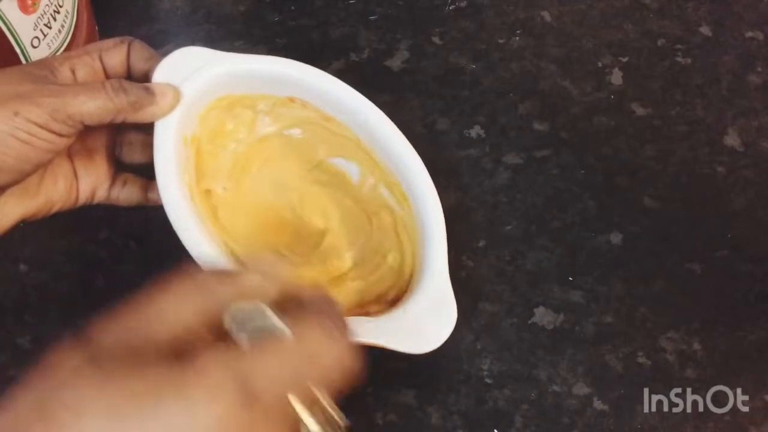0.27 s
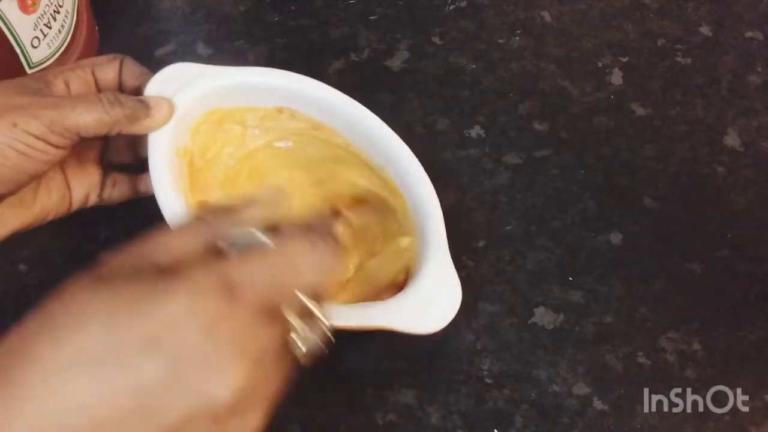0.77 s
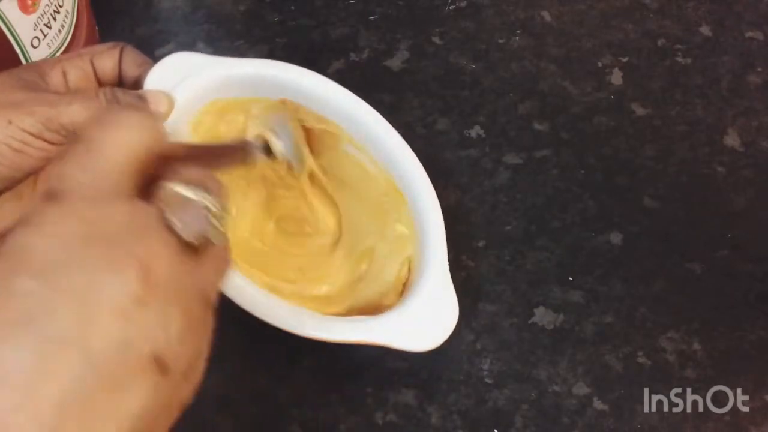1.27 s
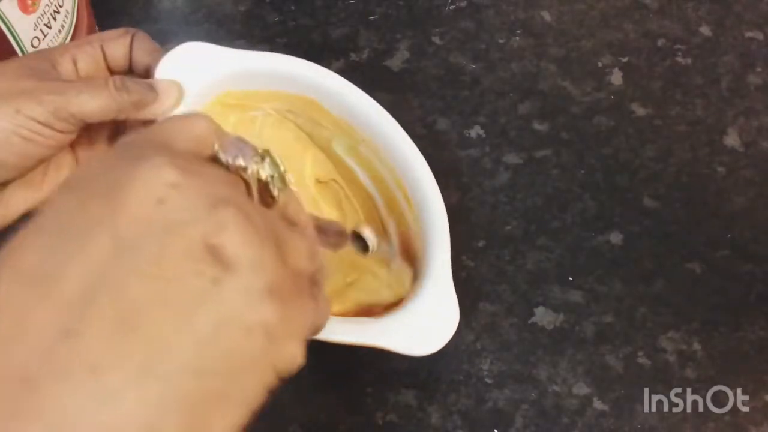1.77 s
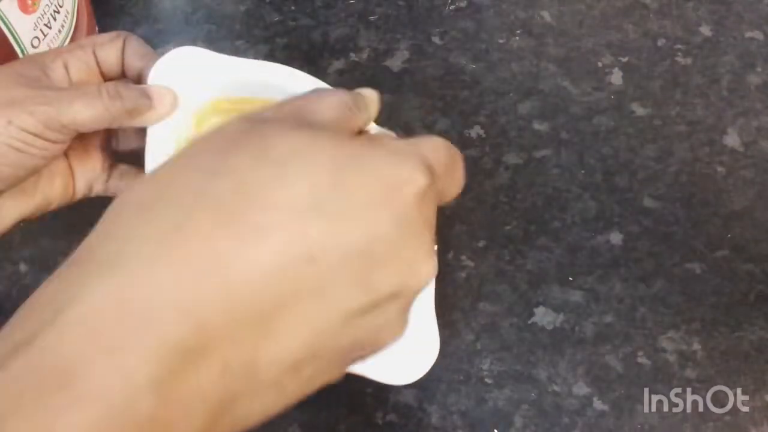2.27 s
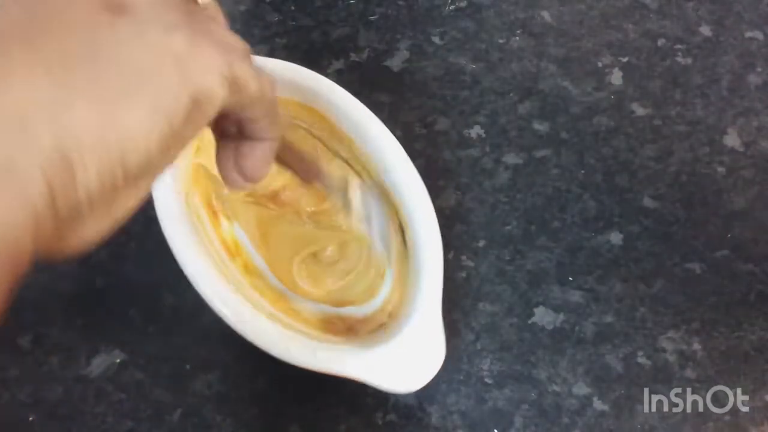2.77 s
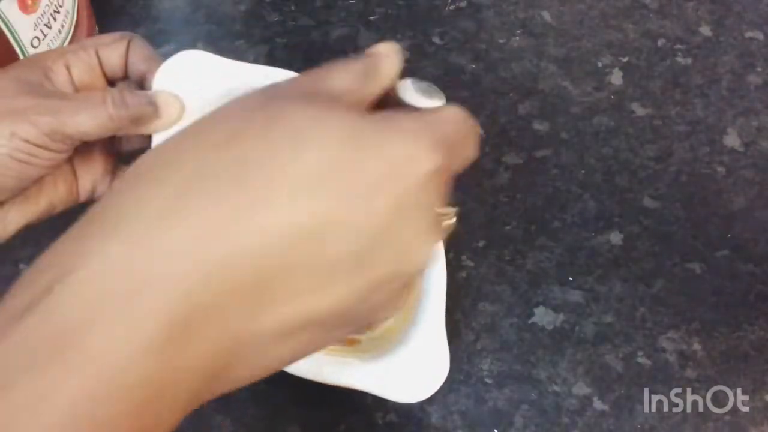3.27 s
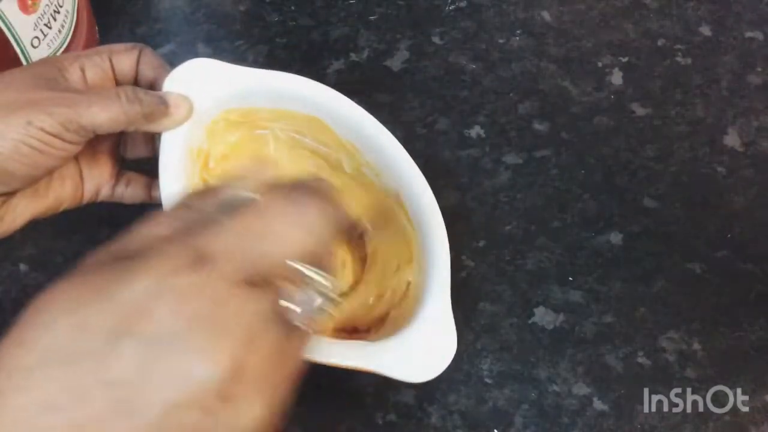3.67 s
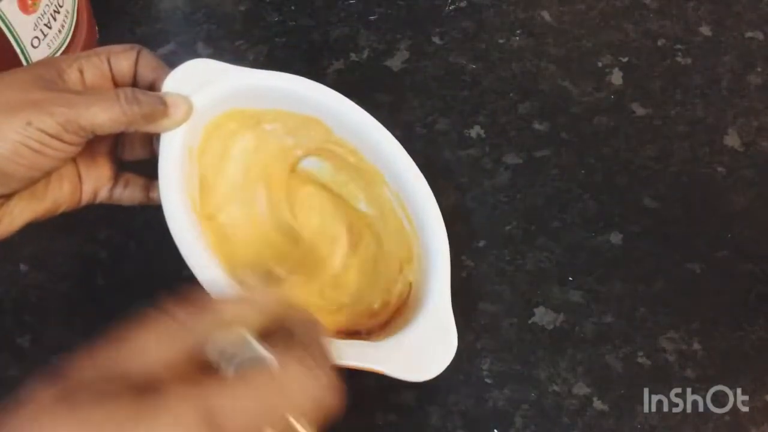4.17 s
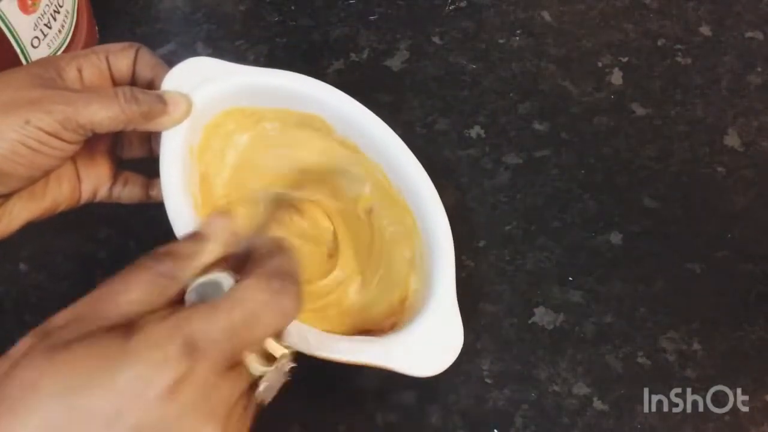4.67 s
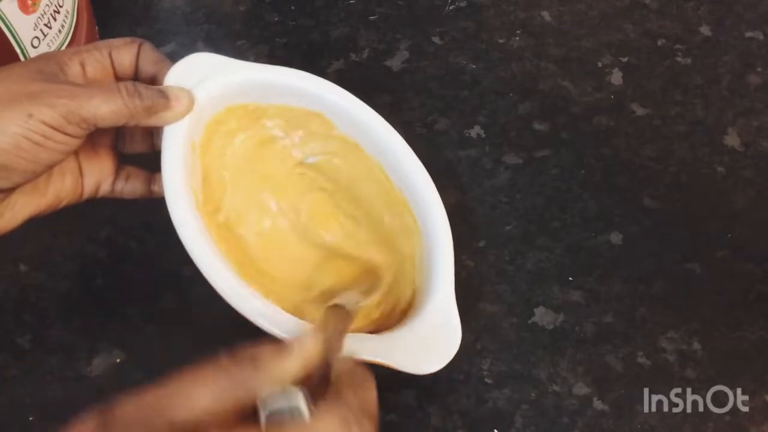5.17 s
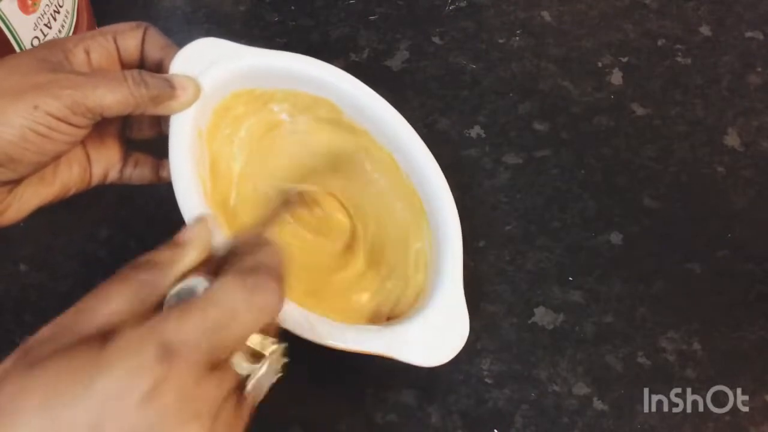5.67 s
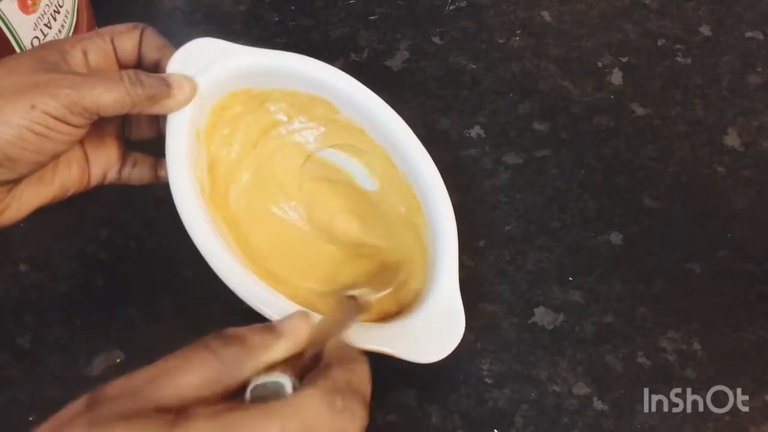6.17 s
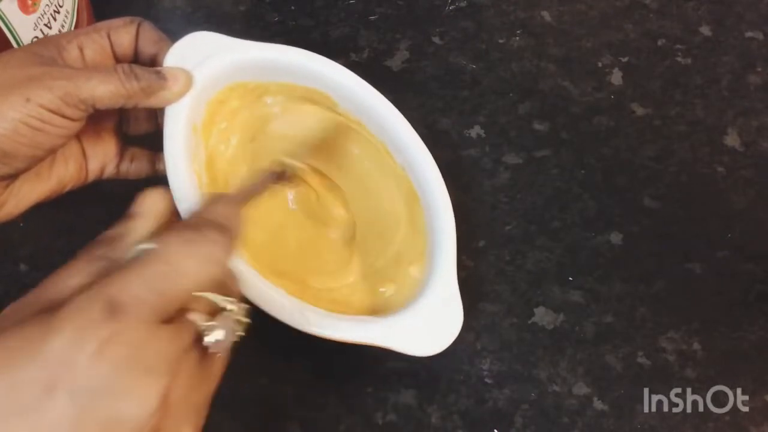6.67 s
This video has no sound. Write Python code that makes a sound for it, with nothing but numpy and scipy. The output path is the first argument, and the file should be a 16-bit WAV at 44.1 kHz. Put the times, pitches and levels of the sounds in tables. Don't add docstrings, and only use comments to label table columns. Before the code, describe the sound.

Close, lively spoon taps ring briefly on a small ceramic dish as thick sauce is stirred, the edge scraping between quick clinking runs.

```python
import sys
import numpy as np
from scipy import signal
from scipy.fft import rfft, irfft
from scipy.io import wavfile
from scipy.ndimage import uniform_filter1d

SR = 44100
rng = np.random.default_rng(int(sys.argv[2]) if len(sys.argv) > 2 else 0)


def rack_gain(trim_db):
    fader = np.asarray(trim_db, float)
    return 10 ** (fader / 20)


def log_audio(samples):
    frames = np.atleast_2d(samples).T
    limited = np.clip(frames, -1, 1)
    pcm = np.round(limited * 32767).astype(np.int16)
    wavfile.write(sys.argv[1], SR, pcm)


N = 304290

# [t/s, crack level/dB, ring level/dB of the 2 kHz, 4.6 kHz and 4.9 kHz families]
TAPS = [(0.161, -21, -36, -21, -50), (0.3976, -20, -32.5, -52, -57), (0.7812, -18.5, -34, -37, -21.5),
        (1.1143, -15, -37, -18.5, -20), (2.7106, -31.5, -38, -33, -29), (2.8342, -13, -40, -19, -31.5),
        (2.8531, -27, -24, -41, -34), (3.6295, -10.5, -14.5, -17.5, -22),
        (3.8388, -14.5, -17.5, -11.5, -10.5), (4.1515, -7, -18, -2.5, -10), (4.3143, -8, -23, -11, -15),
        (4.4534, -16, -20.5, -40, -27.5), (4.6078, -9.5, -25, -39, -12.5),
        (4.9489, -17, -30.5, -3.5, -13.5), (5.082, -11.5, -17.5, -43, -8),
        (5.276, -12.5, -31.5, -12.5, -11), (5.4163, -7, -12.5, -25, -8), (5.6095, -20.5, -29, -50, -15),
        (5.763, -12.5, -21, -3.5, -12), (5.9749, -26.5, -29.5, -20, -18.5), (6.1158, -22, -29, -19.5, -24),
        (6.2935, -20.5, -37, -40, -32.5), (6.6036, -21.5, -36.5, -47, -18.5)]
# [lowest mode f/Hz, twin level/dB, 8 kHz family level/dB, share of ring time]
TAP_SPOTS = [(2000, -2, 4, 0.98), (1965, 9, -9, 0.63), (2125, 5, -3, 0.9), (2073, 6.5, 1.5, 1),
             (1990, -2, 4, 0.78), (2010, -2, -4, 1), (2050, 2, 3, 1), (2052, -3.5, -4, 1),
             (2080, -2, -0.5, 1), (2070, -6, -3, 0.97), (2010, -8, -3.5, 1), (2050, -3, 6, 0.81),
             (1955, 6, 0, 0.7), (1930, -7, 3, .5), (2055, -12, 3.5, 0.75), (1955, 7.5, -6, 0.66),
             (2062, 3, -0.5, 0.76), (1960, -4, 2, 0.61), (1999, 3, 2.5, 0.84), (2030, -5, 2.5, 0.84),
             (1960, -2, -2, 0.7), (2000, -3, -1, 0.94), (1990, 12, 0.5, 0.99)]
# [4.6, 4.9 and 8 kHz mode f/Hz, share of ring time, side of the twin's node (+1 or -1)]
SAUCE_LOADS = [(4680, 4860, 8030, 0.79, 1), (4640, 4853, 8400, .9, 1), (4580, 4850, 8061, .9, 1),
               (4650, 4853, 8045, 0.96, 1), (4640, 4860, 8030, 0.71, 1), (4680, 4400, 9000, 0.88, 1),
               (4700, 4870, 9100, 0.92, -1), (4640, 4400, 8018, 1.1, -1), (4660, 4866, 8287, 0.98, 1),
               (4660, 4882, 8074, 0.99, 1), (4685, 4866, 8053, 0.89, 1), (4618, 4900, 8072, 0.74, 1),
               (4670, 4866, 8109, 0.66, 1), (4650, 4844, 8026, 1, 1), (4635, 4858, 8021, 0.87, 1),
               (4640, 4863, 7200, 0.83, 1), (4624, 4882, 8007, 1.15, 1), (4635, 4855, 8004, 0.75, 1),
               (4720, 4826, 8013, 0.87, 1), (4662, 4870, 8040, 0.7, 1), (4650, 4839, 8037, 0.71, 1),
               (4640, 4860, 8030, .9, 1), (4700, 4815, 8126, 0.64, 1)]
# [low modes after t/s, upper modes after t/s, ring time gained as factor]
CHOKES = [(.02, .02, 1.1), (.02, .02, 1.05), (.010, .018, 1.1), (.014, 0.027, 1.2), (.02, .02, 1.04),
          (.02, 0.024, 1), (0.011, .02, 1.2), (0.012, 0.033, 3.2), (0.025, 0.034, 1.53), (.022, .024, 1.3),
          (0.011, .03, 1.4), (.017, 0.015, 1.14), (0.0062, 0.014, 1.5), (0.0079, .022, 1.1),
          (0.017, 0.014, 1.4), (0.0093, .02, 1.1), (0.021, .021, 1.2), (0.0055, .018, 1.25),
          (0.025, 0.013, 2), (0.014, .014, 1.6), (.010, 0.0097, 1.3), (.02, .02, 1), (.03, .03, 1.27)]
# [t/s, level/dB]
TICKS = [(0.072, -36), (0.6749, -36), (1.024, -28.5), (2.871, -35), (3.5149, -32), (3.943, -26.5),
         (4.1378, -30), (4.556, -30), (5.0104, -34), (5.5104, -45), (6.1649, -35), (6.211, -33),
         (6.553, -22.5), (6.737, -34), (6.0767, -36), (1.5265, -44)]
BOWL_HZ = [
    [2051, 1986, 2148],
    [4643, 4500],
    [4862, 4925],
    [8030, 8150, 8330, 9280, 12120],
]
# [level/dB, t60/s]
BOWL_DECAY = [
    [(4, 0.062), (2, 0.023), (-25, 0.027)],
    [(-3, 0.045), (-30, 0.017)],
    [(-0.5, 0.055), (-36, 0.037)],
    [(4.5, 0.055), (2.5, 0.04), (-0.5, 0.04), (-5, 0.038), (-10, 0.025)],
]
# [f/Hz, level/dB per Hz]
CRACK_SPECTRUM = [(410, -85), (700, -43), (1790, -14), (3040, -9), (4890, -3.5), (6450, -9), (8290, -7),
                  (10400, -16.5), (15200, -22), (16500, -74)]
# [t/s, level/dB, f/Hz]
KNOCKS = [(0.073, -27, 1450), (0.165, -31.5, 1350), (0.398, -18.5, 1570), (0.6766, -29, 1570),
          (0.7798, -31, 1240), (1.0248, -21, 1570), (1.1912, -36.5, 1060), (1.4312, -34, 1630),
          (2.834, -41, 1170), (2.866, -37, 1200), (2.7092, -31, 1340), (2.854, -27, 1430),
          (3.5167, -32, 1320), (3.8427, -23, 1750), (3.9444, -19.5, 1420), (4.153, -22, 1520),
          (4.2597, -27, 1460), (4.396, -32, 1680), (4.4524, -15, 1657), (4.557, -23.5, 1420),
          (4.838, -39, 1430), (4.949, -31, 1610), (5.0126, -35.5, 1280), (5.0826, -8.5, 1703),
          (5.2742, -24.5, 1610), (5.4182, -14, 1570), (5.5112, -28.5, 1570), (5.866, -34.5, 1530),
          (6.1186, -24, 1800), (6.166, -30, 1330), (6.2121, -27.5, 1570), (6.5548, -15.5, 1430)]
# [t/s, level/dB, f/Hz]
TOUCHES = [
    (1.527, -43, 1200),
    (1.59, -39.5, 1680),
    (3.393, -42, 1600),
    (4.091, -42, 1280),
    (6.392, -45.5, 1170),
]
# [t/s, level/dB, trapped hollow f/Hz]
SLAPS = [(0.0726, -44, 3750), (0.164, -32, 3900), (0.7808, -11.5, 3920), (1.0248, -44, 3750),
         (1.192, -41, 3400), (2.7096, -32, 3750), (3.517, -42, 3750), (3.6295, -11, 3500),
         (3.84, -19.5, 3750), (4.152, -12, 3570), (4.4525, -23, 3750), (4.608, -20, 2700),
         (4.949, -11, 3900), (5.0832, -12, 7700), (5.276, -17.5, 4060), (5.417, -12, 3230),
         (5.61, -20, 2700), (5.762, -19.5, 3210), (5.9735, -18, 3970), (5.9734, -23.5, 3250),
         (5.974, -21.5, 2400), (6.1167, -17, 2240), (6.557, -41, 3750), (6.6034, -26, 2510)]
# [t/s, level/dB, f/Hz]
CHATTER_STROKES = [(1.6523, -40, 1830), (1.7032, -42, 2010), (1.7122, -40, 2090), (1.7336, -34, 2000),
                   (1.9142, -45, 2090), (1.9446, -33, 2260), (1.9516, -30, 2150), (1.9776, -35, 2080),
                   (2.0509, -41, 1940), (2.0509, -38, 2000), (2.0709, -35, 1980), (2.0983, -38, 1910),
                   (2.1297, -33, 1950), (2.1392, -39, 1960), (2.1656, -46, 1940), (2.2095, -40, 2000),
                   (3.0954, -34, 2020), (3.1014, -31, 2050), (3.1068, -28, 2010), (3.1184, -31, 1990),
                (3.1264, -30, 1960), (3.1418, -28, 1990), (3.1524, -31, 2000), (3.1732, -39, 2010),
                (3.2181, -42, 1930), (3.2312, -35, 1820), (3.2794, -42, 2010)]
# [t/s, level/dB, f/Hz]
CHATTER_FINE = [(1.4315, -38, 2030), (1.526, -41, 4640), (1.706, -38, 4860), (1.944, -35, 4640),
                (1.956, -34, 4640), (2.166, -40, 4650), (2.235, -41, 4850), (3.624, -33, 4750),
                (3.692, -30, 2050), (5.322, -31, 2000), (5.998, -29, 1980), (6.015, -33, 1900),
                (6.036, -28, 2050), (6.0767, -32, 1990), (6.0767, -39, 4800), (6.655, -32, 2000)]
# [t/s, glaze pressure level/dB, pushed sauce level/dB]
STIR = [(0.0, -50.5, -41.5), (0.48, -45, -44.5), (0.69, -50, -41), (0.94, -50.5, -66), (1.44, -49.5, -48),
        (1.67, -48.5, -41), (2.11, -39.5, -53), (2.3, -45, -39), (2.56, -77, -43.5), (2.9, -70, -63),
        (3.23, -43, -46), (3.36, -51.5, -50), (3.8, -45.5, -35.5), (4.26, -55, -64), (4.77, -42, -47),
        (5.5, -44.5, -44), (6.23, -47.5, -41.5), (6.9, -50, -47)]
# [start t/s, end t/s, ring level/dB, hollow level/dB, smear level/dB]
STROKES = [(1.294, 1.337, -68, -53.5, -79), (1.362, 1.426, -56, -51.5, -62), (1.598, 1.734, -53, -55, -64),
           (1.66, 1.836, -53, -53.5, -69), (1.912, 2.004, -51, -51, -55), (2.035, 2.167, -54, -54, -57),
           (2.094, 2.27, -51.5, -58, -51), (2.99, 3.06, -54, -61, -66), (3.054, 3.198, -45, -52, -50.5),
           (3.162, 3.318, -57, -53.5, -64), (3.392, 3.52, -48, -60, -46), (4.008, 4.153, -49, -61, -48.5)]
# [f/Hz, width f/Hz, level/dB]
HOLLOW = [(1200, 260, 0), (1570, 150, 5.5), (2400, 2080, -3.5)]
# [f/Hz, width f/Hz, level/dB]
SMEAR = [(3300, 610, -2), (3900, 730, -1), (5140, 1450, -4), (9200, 2900, -7.5)]
# [start t/s, end t/s, level/dB, first f/Hz, last f/Hz]
SUCKS = [(.165, 0.184, -41.5, 1954, 1495), (0.348, 0.397, -52.5, 1780, 1780),
         (1.378, 1.404, -52, 1700, 1780), (1.735, 1.805, -49, 2300, 2400), (1.927, 1.99, -44, 2300, 2177),
         (2.117, 2.232, -46, 1610, 1570), (3.16, 3.272, -48, 1058, 1373), (3.208, 3.263, -51, 1666, 1770),
         (3.75, 3.816, -46.5, 1950, 1800), (4.765, 4.805, -50, 1350, 1550), (3.075, 3.15, -52, 1400, 1250),
         (1.6, 1.64, -52.5, 2400, 2600), (5.385, 5.413, -49, 1030, 1280), (5.987, 6.045, -46, 2030, 1565)]
# [start t/s, end t/s, level/dB, first f/Hz, last f/Hz]
SMACKS = [(0.162, 0.267, -47.5, 4260, 3890), (.45, 0.578, -50, 3640, 4030), (0.784, 0.928, -55, 3900, 4020),
          (1.13, 1.2, -49.5, 2900, 3300), (1.64, 1.7, -50, 3200, 3140), (1.702, 1.73, -49, 4970, 5000),
          (3.094, 3.156, -48.5, 3300, 3190), (3.43, 3.483, -47, 4320, 5300), (3.64, 3.72, -43, 3000, 3300),
          (3.72, 3.83, -48, 3500, 3200), (4.045, 4.11, -43, 3950, 3850), (4.647, 4.704, -44.5, 3800, 4070),
          (4.76, 4.79, -47.5, 4230, 3820), (4.963, 5.046, -51, 3820, 4070),
          (5.645, 5.72, -47.5, 3130, 3800), (6.306, 6.37, -47.5, 3670, 3670),
          (6.63, 6.7, -44.5, 3300, 3900)]
# [start t/s, end t/s, level/dB, first f/Hz, last f/Hz]
WHISTLES = [
    (4.635, 4.7, -42.5, 2000, 1146),
    (5.318, 5.36, -45, 1930, 1127),
    (5.682, 5.728, -46, 1930, 1177),
]
# [t/s, level/dB, bass level/dB, low modes level/dB]
THUDS = [(0.073, -54, -62, -61), (0.162, -44.5, -64, -78), (0.397, -31, -64, -48), (0.674, -55, -70, -73),
         (0.781, -32.5, -48, -52), (1.025, -37, -64, -70), (1.114, -34, -65, -61),
         (2.707, -35.5, -52.5, -57), (2.834, -36, -53, -44.5), (2.853, -35.5, -52, -59),
         (2.873, -37, -67, -55), (3.127, -52, -56, -61), (3.513, -40.5, -63, -57), (3.629, -24.5, -61, -49),
         (3.703, -43, -78, -74), (3.84, -59, -82, -81), (3.942, -40, -64, -68), (4.313, -39.5, -58, -62),
         (4.556, -43, -61, -61), (4.607, -37, -57, -54), (4.946, -33, -72, -59), (5.274, -33.5, -64, -49.5),
         (5.609, -40, -69, -61.5), (5.762, -47, -77, -64), (6.115, -51.5, -63, -58),
         (6.289, -43.5, -73, -64), (6.555, -39.5, -49.5, -45), (6.603, -42, -76, -66)]
# [highest of the upper three counter modes over their lowest,
# level/dB]
THUD_TILT_DB = [-4, 4, 2.5, 3, 2, 8, 7, 3, -1, -1, 1, 1, -1, 1, 1, 3, 3, -0.5, -3, 1, -5, -2, -1, -1, 1, 2,
                -5, 5]
# [f/Hz, level/dB, t60/s]
COUNTER = [(262.5, -4, 0.18), (318.7, -1, 0.15), (373, 1.5, 0.09), (430, 2.5, 0.075), (505, -3.5, 0.12)]
# [t/s, level/dB]
PUSHES = [
    (0.398, -48),
    (0.782, -47),
    (2.708, -53),
    (2.835, -48),
    (2.8532, -30),
    (2.874, -41),
    (3.628, -44),
    (4.948, -57),
    (5.273, -48),
    (6.554, -44),
]
# [f/Hz, width f/Hz, level/dB]
PUSH_BODY = [(332, 320, 1), (109, 150, 4.5)]
# [start t/s, end t/s, level/dB]
SHOVE = (1.67, 2.41, -63)
# [f/Hz, level/dB per Hz]
HISS_SPECTRUM = [(21, -37), (35, -10), (275, -10), (338, -16), (448, -8), (537, -10), (1290, -11.5),
                 (2160, -8), (2450, -10), (3700, -7), (4790, -5.5), (5890, -3), (9360, -1.5),
                 (15300, -16.5), (16500, -15)]

BOWL = [[(hz, *decay) for hz, decay in zip(*family)] for family in zip(BOWL_HZ, BOWL_DECAY)]   # f/Hz, level/dB, t60/s


def rms_one(x):
    return x / np.sqrt(np.mean(x ** 2) + 1e-20)


def clicks(times, db):
    out = np.zeros(N) + 1e-18
    at = np.round(np.asarray(times) * SR).astype(int)
    np.add.at(out, np.clip(at, 0, N - 1), rack_gain(np.asarray(db)))
    return out


def ring(x, hz, t60):
    r, w = rack_gain(-60 / (t60 * SR)), 2 * np.pi * hz / SR
    return signal.lfilter([0, np.sin(w)], [1, -2 * r * np.cos(w), r * r], x)


def modes(x, table):
    return sum((-1) ** k * rack_gain(db) * ring(x, hz, t60) for k, (hz, db, t60) in enumerate(table))


def resonate(x, table):
    return sum((-1) ** k * rack_gain(db) * signal.lfilter(*signal.iirpeak(hz, hz / width, fs=SR), x)
               for k, (hz, width, db) in enumerate(table))


def colour(x, spectrum):
    hz, db = np.transpose(spectrum)
    grid = np.fft.rfftfreq(8192, 1 / SR)
    cepstrum = irfft(np.log(rack_gain(np.interp(np.log(grid + 1), np.log(hz), db))))
    cepstrum[1:4096] *= 2
    cepstrum[4097:] = 0
    return signal.fftconvolve(x, irfft(np.exp(rfft(cepstrum))))[:N]


def drift(rate):
    r = np.exp(-2 * np.pi * rate / SR)
    return rms_one(signal.lfilter([1], [1, -2 * r, r * r], rng.standard_normal(N + SR))[SR:])


def grains(per_s, spread_db):
    born = rng.random(N) < per_s / SR
    size = rack_gain(spread_db * np.minimum(rng.exponential(1, N), 4))
    return rms_one(born * size * rng.choice([-1, 1], N))


def burst(times, db, t60, rise_s=0.001):
    swell = np.exp(-1 / (rise_s * SR))
    dying = signal.lfilter([1], [1, -rack_gain(-60 / (t60 * SR))], clicks(times, db))
    return signal.lfilter([1 - swell], [1, -swell], dying) * rng.standard_normal(N)


def hump(start, end, edge):
    span = slice(int(start * SR), int(end * SR))
    return span, signal.windows.tukey(span.stop - span.start, np.clip(edge, 0, 1))


def taps():
    s, crack_db, *family_db = np.transpose(TAPS)
    low_hz, twin_db, top_db, low_lasting = np.transpose(TAP_SPOTS)
    *upper_hz, upper_lasting, side = np.transpose(SAUCE_LOADS)
    low_choke_s, upper_choke_s, gained = np.transpose(CHOKES)
    tick_s, tick_db = np.transpose(TICKS)
    top_follows = np.dot((0.66, 0.46, 0.0061, 0.086), [crack_db, *family_db])
    family_db.append(top_db - 7.5 + top_follows)

    crack = colour(burst(np.r_[s, tick_s], np.r_[crack_db + 8.5, tick_db + 12.0], t60=0.011), CRACK_SPECTRUM)
    rattle = colour(burst(s, crack_db - 6.5, t60=0.055), CRACK_SPECTRUM)

    size, detune, choke_t60_s = SR // 4, 0.004, 0.019
    since, one_tap = np.arange(size) / SR, np.arange(size) < 200
    loaded_hz = dict(zip((0, 3, 5, 7), [low_hz, *upper_hz]))
    rings, chance = np.zeros(N), rng.standard_normal((len(s), 20))
    every_mode = [(db, *mode) for db, family in zip(family_db, BOWL) for mode in family]
    for k, (db, hz, mode_db, t60) in enumerate(every_mode):
        is_low, is_twin = k < len(BOWL[0]), k == 1
        side_mode_db = 3.0 * chance[:, k] * (mode_db < 0)
        strength_db = db + mode_db + side_mode_db + twin_db * is_twin
        touch = clicks(s, strength_db - 25.5)
        full_weight = clicks(s + round(0.00074 * hz) / hz, strength_db - 2.5)
        contact = touch + full_weight
        pitch_hz = loaded_hz.get(k, hz * (1 + detune * chance[:, -1 - k % 8]))
        shares = low_lasting * gained if is_low else upper_lasting * np.sqrt(gained)
        chokes_s = low_choke_s if is_low else upper_choke_s
        signs = np.sign(side) if is_twin else np.ones(len(s))
        starts = (s * SR).astype(int) - 9
        for at, tap_hz, share, sign, choke_s in zip(starts, pitch_hz, shares, signs, chokes_s):
            free = ring(contact[at:at + size] * one_tap, tap_hz, t60 * share)
            choke = rack_gain(-60 * np.maximum(since - choke_s, 0) / choke_t60_s)
            rings[at:at + size] += sign * free * choke
    lowcut = signal.butter(4, 1100, "high", fs=SR, output="sos")
    return crack + rattle + signal.sosfilt(lowcut, rings)


def knocks():
    s, peak_db, pitch_hz = np.transpose(KNOCKS + TOUCHES)
    t, out = np.arange(600) / SR, np.zeros(N + 600)
    peak_s, rise_s, fall_s = 0.0015, 0.00077, 0.0014
    shape = np.exp(-((t - peak_s) / np.where(t < peak_s, rise_s, fall_s)) ** 2)
    for at, db, hz in zip((s * SR).astype(int), peak_db, pitch_hz):
        tone = np.sin(2 * np.pi * hz * t) + 0.39 * np.sin(2.9 * np.pi * hz * t)
        out[at:at + len(t)] += rack_gain(db - 1.5) * tone * shape
    return out[:N]


def slaps():
    thrown = [(s, db - 16.5, 3750) for s, db, _ in KNOCKS]
    out, size = np.zeros(N + SR), 1500
    t = np.arange(size) / SR
    shape = (1 - np.exp(-t / 0.00091)) * rack_gain(-60 * t / 0.0086)
    noise = rng.standard_normal(N)[:N // size * size].reshape(-1, size)
    for (s, db, hz), puff in zip(SLAPS + thrown, noise):
        puff = resonate(puff * shape, [(hz, 0.092 * hz, 0)])
        puff = resonate(puff, [(hz, 0.7 * hz, 0)])
        at = int(s * SR)
        out[at:at + size] += rack_gain(db) * puff / np.abs(puff).max()
    return out[:N]


def chatter():
    t, out = np.arange(2000) / SR, np.zeros(N)
    rise_s, t60_s = 0.0011, 0.034
    shape = (1 - np.exp(-t / rise_s)) * rack_gain(-60 * t / t60_s)
    for s, db, hz in CHATTER_STROKES + CHATTER_FINE:
        at = int(s * SR)
        out[at:at + len(t)] += rack_gain(db + 1.5) * shape * np.sin(2 * np.pi * hz * t)
    return out


def drags():
    s, crack_db = np.transpose(TAPS)[:2]
    lead_s, rise_s, hold_s, t60_s = 0.013, 0.006, 0.075, 0.26
    t = np.arange(SR // 2) / SR
    release = rack_gain(-60 * np.maximum(t - rise_s - hold_s, 0) / t60_s)
    shape = np.minimum(t / rise_s, 1) * release
    starts = clicks(s - lead_s, -31.5 + 0.65 * crack_db)
    return np.abs(signal.fftconvolve(starts, shape)[:N])


def stir():
    s, *levels = np.transpose(STIR)
    press_db, sauce_db = (np.interp(np.arange(N) / SR, s, db) - 11.0 for db in levels)
    drag = rack_gain(-11.5) * drags()
    scrape = rack_gain(press_db) + drag
    wet = rack_gain(sauce_db) + rack_gain(-2) * drag
    rumble_gain = rack_gain(-38.5 + 0.64 * press_db) + rack_gain(-34) * drag
    gains = np.array([rack_gain(-2) * scrape, rack_gain(-4.5) * scrape, rack_gain(-5) * scrape, wet])
    for start, end, ring_db, hollow_db, smear_db in STROKES:
        span, shape = hump(start, end, edge=0.8)
        db = np.array([ring_db, hollow_db, ring_db - 5, smear_db])
        gains[:, span] += rack_gain(db - 0.5)[:, None] * shape
        rumble_gain[span] += rack_gain(hollow_db - 24) * shape
    shove_start, shove_end, shove_db = SHOVE
    span, shape = hump(shove_start, shove_end, edge=1.0)
    rumble_gain[span] += rack_gain(shove_db) * shape

    unrest = drift(20.6)
    slips = grains(2000, spread_db=4.0) * rack_gain(2.6 * unrest)
    slow = rms_one(uniform_filter1d(unrest[::-1], size=3000))
    gains[0] *= rack_gain(3.0 * slow)

    low = modes(slips, [(hz, db, 0.24 * t60) for hz, db, t60 in BOWL[0]])
    wander = 0.012
    speed = 1 - wander / 2 + wander * np.roll(slow, N // 2)
    low = np.interp(np.cumsum(speed) % (N - 1), np.arange(N), low)

    hollow = resonate(resonate(np.roll(slips, N // 3), HOLLOW), HOLLOW)
    upper = modes(slips, [(hz, db, 1.1 * t60) for hz, db, t60 in BOWL[1] + BOWL[2]])
    top = modes(slips, [(hz, db, t60 / 2) for hz, db, t60 in BOWL[3]])
    high = rms_one(upper) + rack_gain(-2.5) * rms_one(top)
    smear = resonate(grains(5000, spread_db=-0.5) * rack_gain(2.2 * drift(29.0)), SMEAR)

    white = rng.standard_normal(N)
    bass = resonate(white, [(148, 110, 0), (650, 380, -0.5)])
    rumble = rms_one(modes(white, COUNTER)) + rms_one(bass)
    slide = sum(gain * rms_one(layer) for gain, layer in zip(gains, (low, hollow, high, smear)))
    return slide + rumble_gain * rumble


def squelches():
    out = np.zeros(N)
    rough, lumps = rng.standard_normal((2, N)), rack_gain(1.2 * drift(45))
    kinds = [(SUCKS, 0.11, 1), (SMACKS, 0.18, 0.1), (WHISTLES, 0.062, 2.2)]
    pockets = [(*row, share * row[3], tone) for rows, share, tone in kinds for row in rows]
    for start, end, db, first_hz, last_hz, width_hz, tone in pockets:
        span, shape = hump(start, end, edge=0.27)
        a, b = signal.lfilter(*signal.butter(2, width_hz / 2, fs=SR), rough[:, span])
        left = np.linspace(1, 0, len(shape)) ** 1.5
        phase = 2 * np.pi * np.cumsum(last_hz * (first_hz / last_hz) ** left) / SR
        voice = (a + tone * a.std()) * np.cos(phase) + b * np.sin(phase)
        lumpy = lumps[span] ** (1 / (1 + tone)) * voice
        out[span] += rack_gain(db - 2.5) * shape * rms_one(lumpy)
    return out


def spatter():
    bright = signal.butter(1, [4500, 20700], "band", fs=SR, output="sos")
    return signal.sosfilt(bright, burst([2.835], [-27], t60=0.07))


def thuds():
    s, peak_db, bass_db, low_db = np.transpose(THUDS)
    blow = burst(s, peak_db - 20.5, t60=0.013)
    latest = np.maximum(np.searchsorted(s * SR, np.arange(N) + 1) - 1, 0)
    tilt_db = np.array(THUD_TILT_DB)[latest]
    upper = sum((-1) ** k * modes(blow * rack_gain((k - 1) / 2 * tilt_db), [mode])
                for k, mode in enumerate(COUNTER[2:]))
    lower = modes(burst(s, low_db - 6.5, t60=0.0098), COUNTER[:2])
    push = resonate(clicks(*np.transpose(PUSHES)), PUSH_BODY)
    push = rack_gain(35.5) * resonate(push, [(260, 580, 0)])
    bass = burst(s, bass_db + 25.0, t60=0.07, rise_s=0.0068)
    return upper + lower + push + resonate(bass, [(108, 27, 4.4), (190, 220, 0.5)])


def kitchen(x):
    t60_s, wall_cut_hz = 0.39, 17640
    t = np.arange(int(.6 * SR)) / SR
    low, high = rng.standard_normal((2, len(t)))
    dark, bright = [signal.butter(1, wall_cut_hz, kind, fs=SR, output="sos") for kind in ("low", "high")]
    tail = signal.sosfilt(dark, low) * rack_gain(-60 * t / t60_s)
    tail = tail + signal.sosfilt(bright, high) * rack_gain(-60 * t / (0.58 * t60_s))
    tail = tail * (1 - np.exp(-(t / 0.0016) ** 2))
    return signal.fftconvolve(x, tail / np.sqrt(np.sum(tail ** 2)))[:N]


def hiss():
    air = rms_one(colour(rng.standard_normal(N), HISS_SPECTRUM))
    hum = rms_one(resonate(rng.standard_normal(N), [(54.4, 44, -2.1), (113.7, 12.4, -0.37)]))
    return rack_gain(-49.5 + 0.7 * drift(0.52)) * air + rack_gain(-69.0 + 2.5 * drift(0.34)) * hum


def scene():
    bowl = taps() + knocks() + slaps() + thuds() + chatter()
    echo = rack_gain(-9) * kitchen(bowl)
    return (bowl + echo + stir() + squelches() + spatter() + hiss())[None]


def top_cut(x):
    return signal.sosfilt(signal.butter(12, 16640, fs=SR, output="sos"), x)


def record(dry):
    port = signal.sosfilt(signal.butter(4, 42, "high", fs=SR, output="sos"), dry)
    clipped = np.clip(port, -1, 1)
    mix = signal.sosfilt(signal.cheby2(12, 70, 17100, fs=SR, output="sos"), clipped)
    return top_cut(mix)


dry = scene()
out = record(dry)
log_audio(out)
```